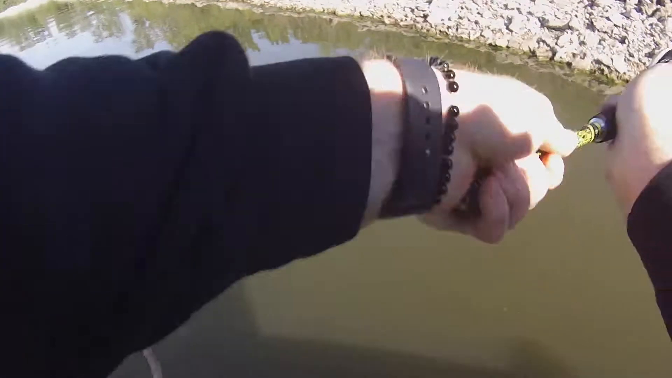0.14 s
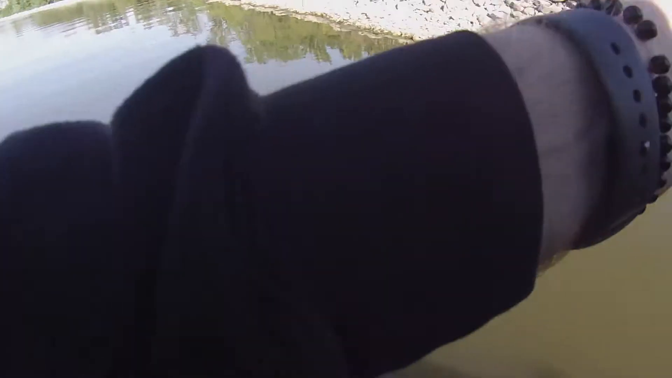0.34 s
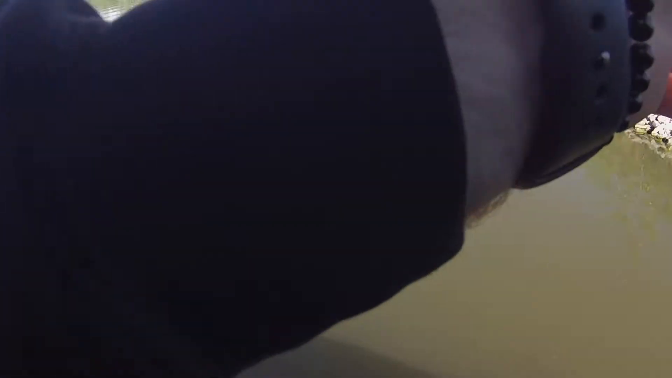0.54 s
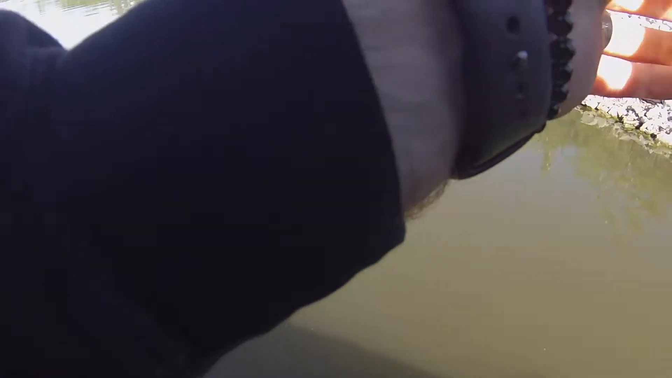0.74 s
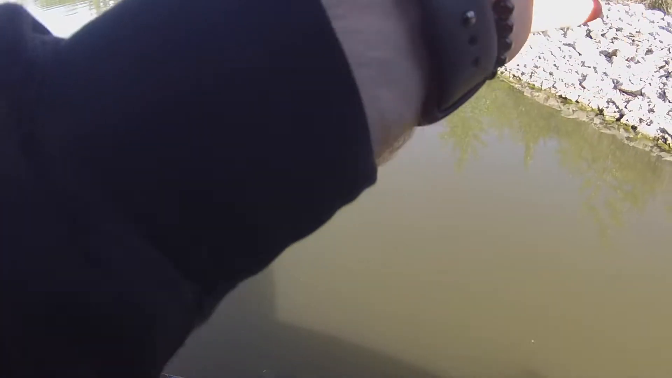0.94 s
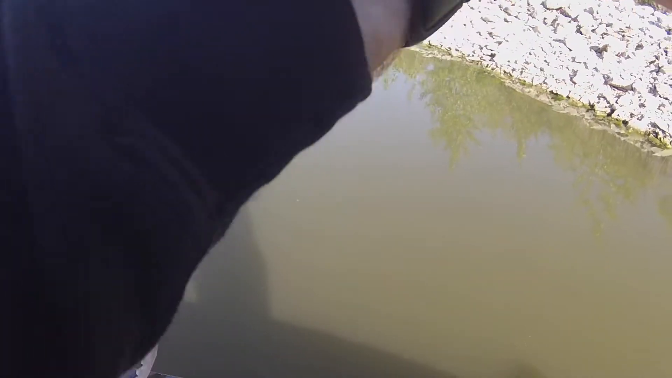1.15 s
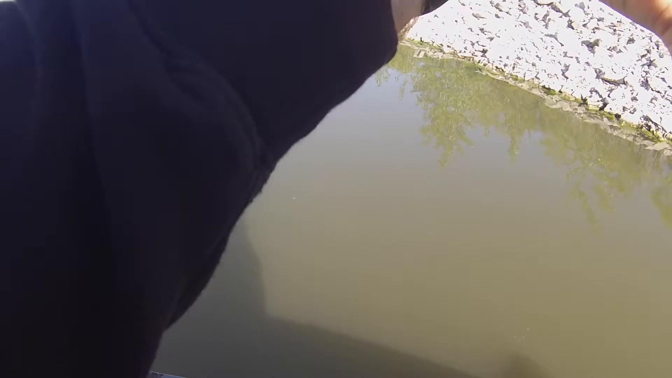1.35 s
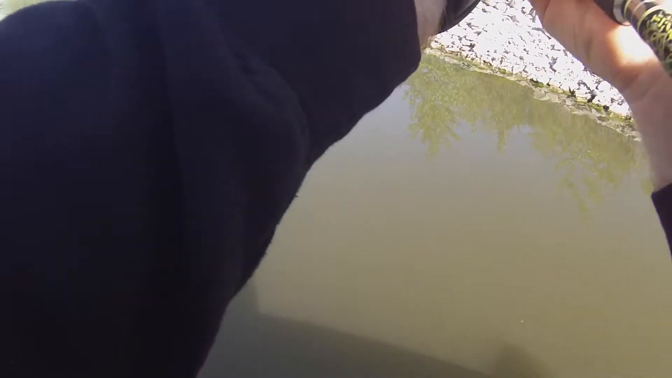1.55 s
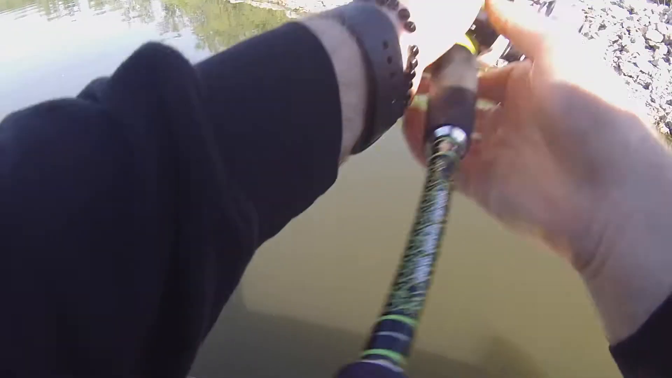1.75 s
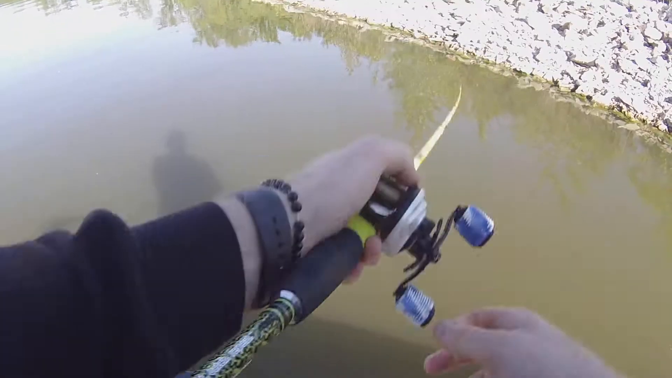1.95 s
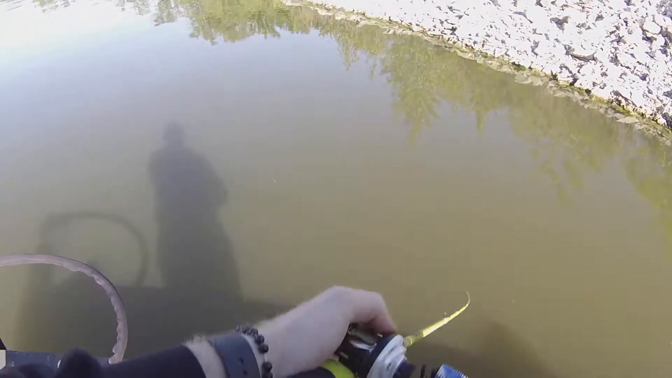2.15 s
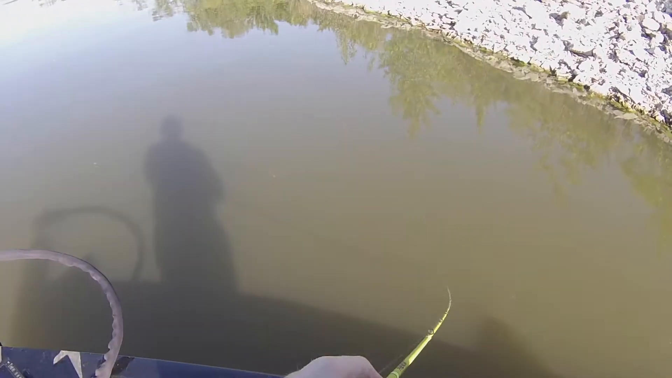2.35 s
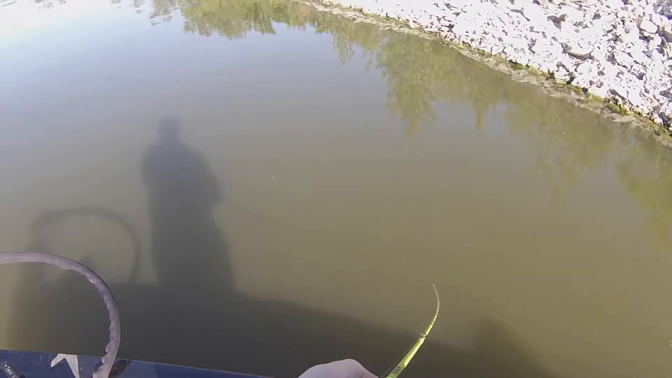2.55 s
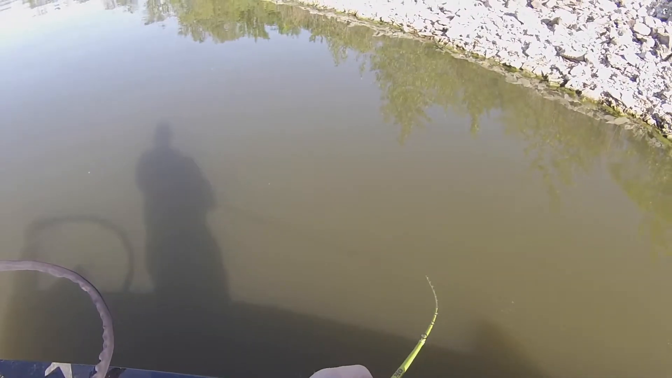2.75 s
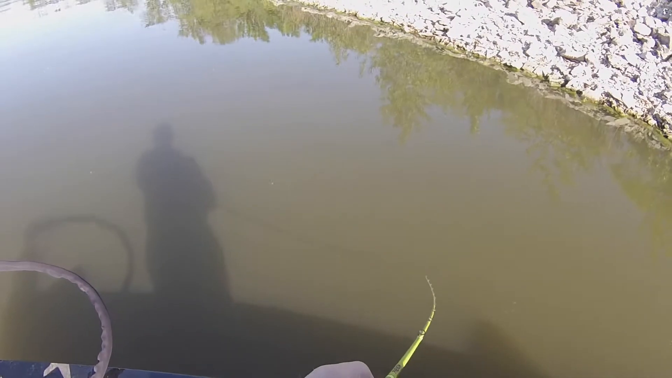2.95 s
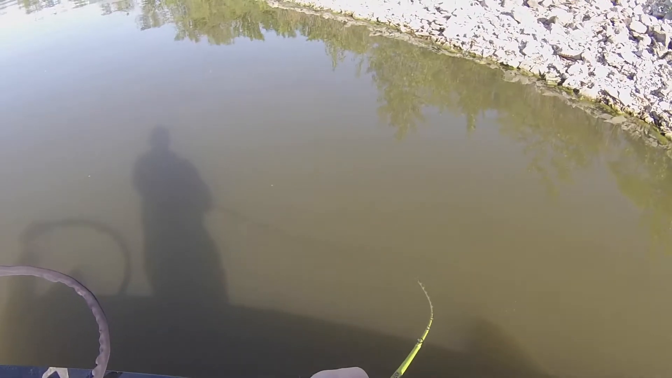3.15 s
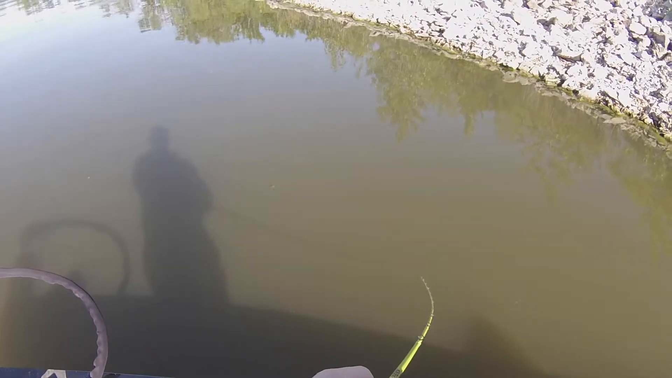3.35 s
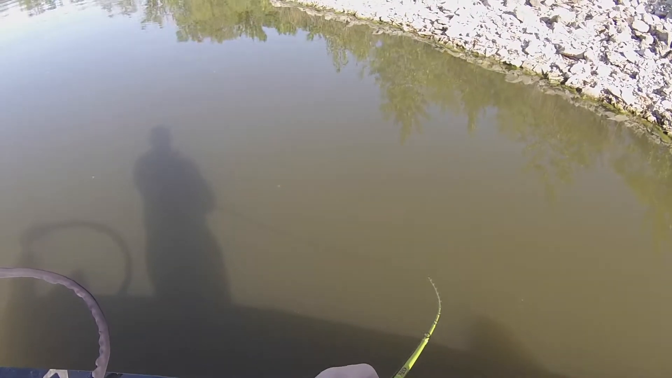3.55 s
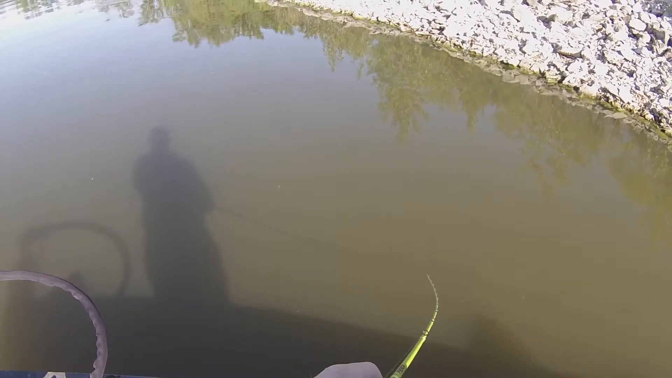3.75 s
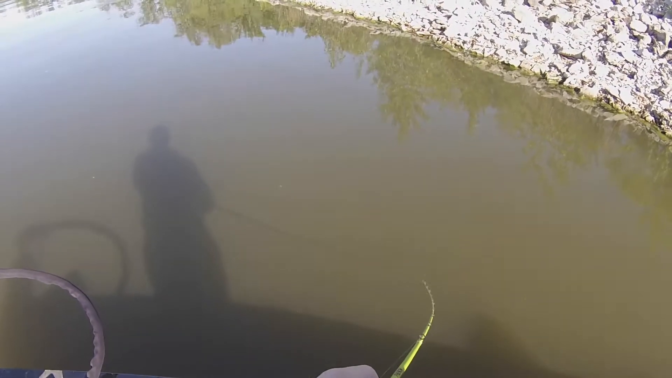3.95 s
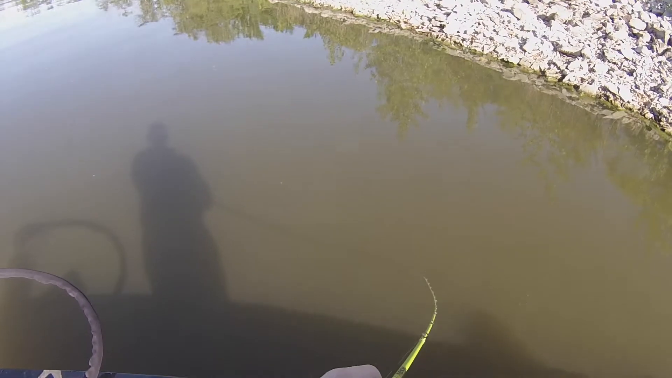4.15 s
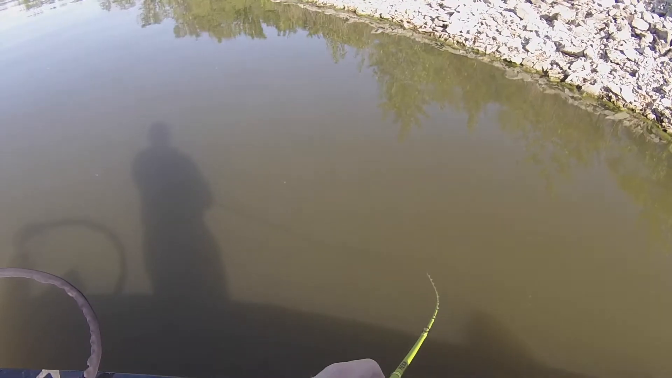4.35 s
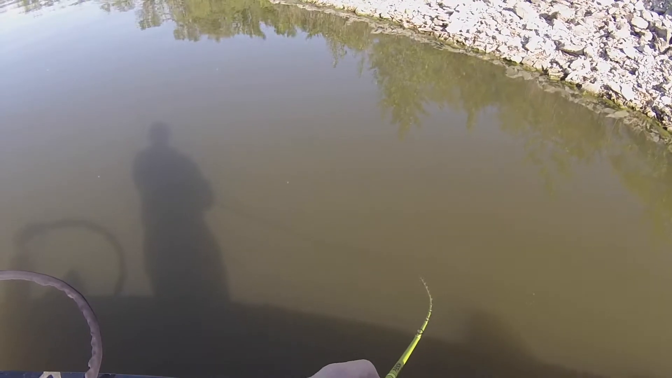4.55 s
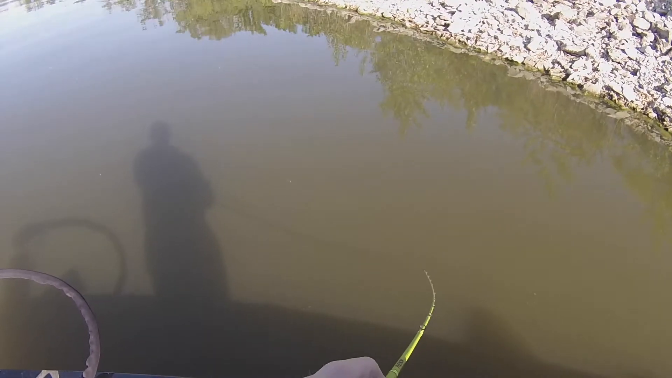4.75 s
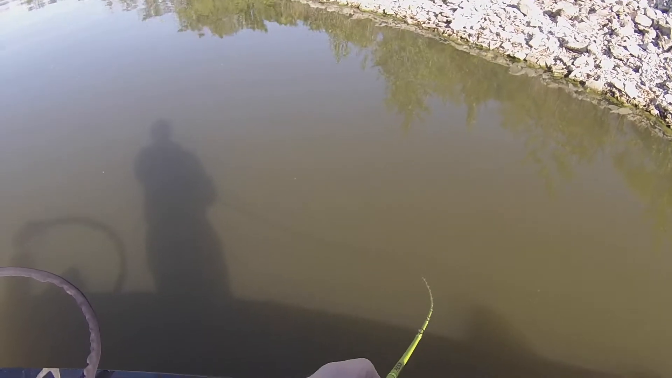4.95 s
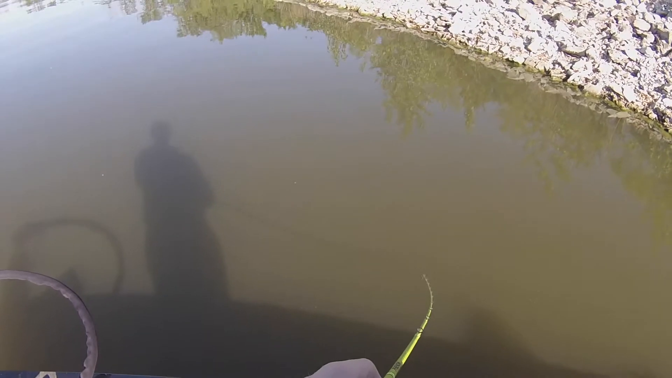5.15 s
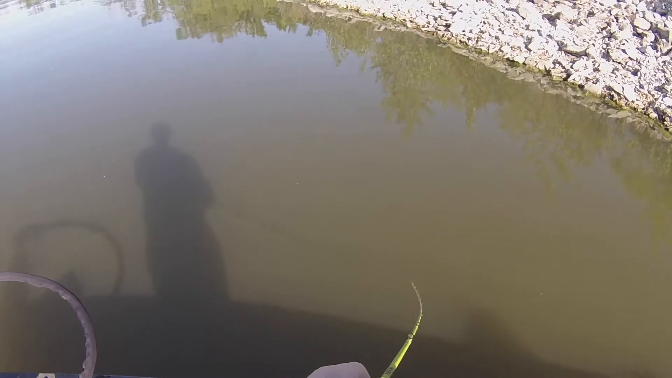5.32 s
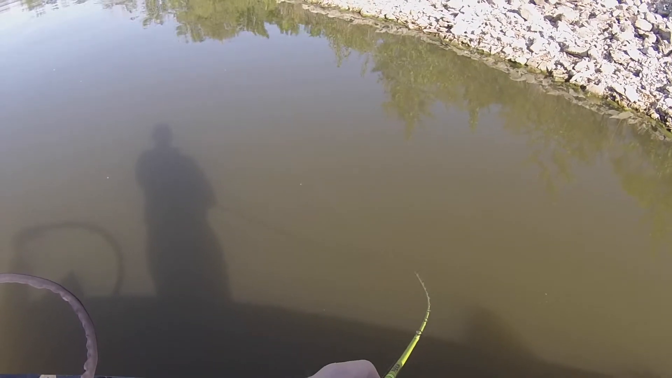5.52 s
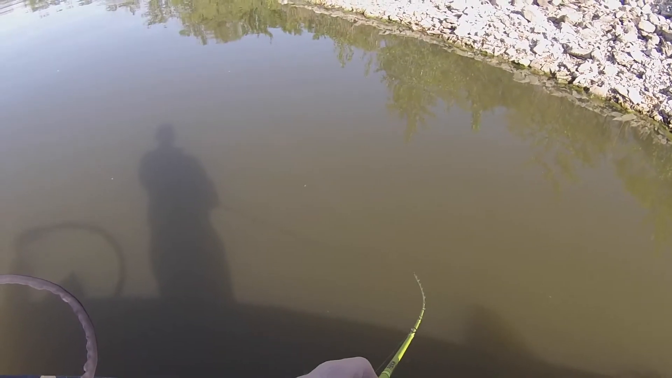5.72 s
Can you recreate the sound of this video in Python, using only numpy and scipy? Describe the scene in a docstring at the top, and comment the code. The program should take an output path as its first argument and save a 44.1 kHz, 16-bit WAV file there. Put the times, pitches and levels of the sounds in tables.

```python
"""A quiet lake shore, the microphone at the chest of an angler casting with a baitcasting reel.
The rod swishes as it sheds eddies, line hisses through the guides, and rough spots on the spool
whir down as it slows. A turn of the handle snaps the clutch shut and sets the frame ringing.
Then wet line is wound in with faint ticks, while water birds and a songbird call far off."""
import sys
import numpy as np
from scipy import signal
from scipy.fft import rfft, irfft
from scipy.io import wavfile
from scipy.ndimage import uniform_filter1d

SR = 44100
rng = np.random.default_rng(int(sys.argv[2]) if len(sys.argv) > 2 else 0)


def master(y):
    """Save y as 16-bit WAV."""
    cut = np.clip(np.atleast_2d(y).T, -1, 1)
    pcm = np.round(cut * 32767)  # scale
    wavfile.write(sys.argv[1], SR, pcm.astype(np.int16))


N = 259308
T = np.arange(N) / SR


def from_db(db):
    """Gain of a level in dB."""
    return 10 ** (np.asarray(db) / 20)


def rms_one(x):
    """Scale to rms 1."""
    return x / np.sqrt(np.mean(x ** 2) + 1e-20)


def envelope(start, attack, hold, release):
    """Straight rise from 0 to 1, hold, straight fall."""
    return np.interp(T, start + np.cumsum([0, attack, hold, release]), [0, 1, 1, 0])


def swell(s, length):
    """A rounded rise and fall centred on s."""
    return np.cos(np.pi * np.clip((T - s) / length, -.5, .5))


def swells(rows):
    """Gain of a set of swells, each (centre t/s, length/s, level/dB)."""
    return sum(from_db(db) * swell(s, length) for s, length, db in rows)


def saturate(x, power):
    """Grows as a power of x below 1 and levels off at 1 above."""
    return x ** power / np.sqrt(1 + x ** (2 * power))


def drift(rate):
    """Random wander of spread 1, with `rate` new values a second."""
    knots = rng.standard_normal(N // 8)
    return np.interp(T * rate, np.arange(len(knots)), knots) / np.sqrt(2 / 3)


def colour(x, spectrum):
    """Minimum-phase filter shaped by (f/Hz, level/dB) points; keeps the power of white noise."""
    size = 8192
    hz, db = np.transpose(spectrum)
    log_hz = np.log(np.maximum(np.fft.rfftfreq(size, 1 / SR), 1))
    gain = rms_one(from_db(np.interp(log_hz, np.log(hz), db)))
    cepstrum = irfft(np.log(gain))
    cepstrum[1:size // 2] *= 2
    cepstrum[size // 2 + 1:] = 0
    return signal.fftconvolve(x, irfft(np.exp(rfft(cepstrum))))[:N]


def noise(spectrum):
    """Coloured noise, rms 1."""
    return rms_one(colour(rng.standard_normal(N), spectrum))


def noise_band(hz, width):
    """A band of noise whose centre may glide; rms 1."""
    lowpass = signal.butter(2, width / 2, fs=SR, output="sos")
    slow = signal.sosfilt(lowpass, rng.standard_normal((2, N)))
    phase = 2 * np.pi * np.cumsum(hz + np.zeros(N)) / SR
    return rms_one(slow[0] * np.cos(phase) + slow[1] * np.sin(phase))


def burst(s, t60):
    """Noise that starts at s and dies away."""
    out, start, size = np.zeros(N), int(s * SR), SR // 8
    out[start:start + size] = rng.standard_normal(size) * np.exp(-np.log(1000) * T[:size] / t60)
    return out


def patter(clicks, t60):
    """Each click becomes a dying burst of noise."""
    decay = np.exp(-np.log(1000) / (t60 * SR))
    return signal.lfilter([1], [1, -decay], clicks + 1e-18) * rng.standard_normal(N)


def resonate(x, hz, width):
    """A resonance with gain 1 at its peak."""
    r, w = np.exp(-np.pi * width / SR), 2 * np.pi * hz / SR
    return signal.lfilter(np.array([1, 0, -1]) * (1 - r * r) / 2, [1, -2 * r * np.cos(w), r * r], x)


def ring(clicks, hz, t60):
    """A unit click sets a sine of height 1 ringing."""
    r, w = from_db(-60 / (t60 * SR)), 2 * np.pi * hz / SR
    return signal.lfilter([0, np.sin(w)], [1, -2 * r * np.cos(w), r * r], clicks + 1e-18)


def strike(clicks, modes):
    """Clicks set every mode of a body ringing."""
    return sum((-1) ** k * from_db(db) * ring(clicks, hz, t60) for k, (hz, db, t60) in enumerate(modes))


def soften(x, hz):
    """A soft contact gives less treble."""
    r = np.exp(-2 * np.pi * hz / SR)
    return signal.lfilter([(1 - r) ** 2], [1, -2 * r, r * r], x + 1e-18)


def touches(rows):
    """The push and the short rough scuff of each contact."""
    pushes = sum(from_db(db) * soften(signal.unit_impulse(N, int(s * SR)), hz) for s, db, _, hz in rows)
    scuffs = sum(from_db(db) * soften(burst(s, t60), hz) for s, db, t60, hz in rows)
    return pushes, scuffs


# air over the lake: f/Hz, relative level/dB
AIR_COLOUR = [(12, -27), (20, -6), (70, 1), (190, 0.5), (255, 0), (328, -5), (678, -9), (900, -14),
              (1150, -12), (1310, -8), (1550, -15), (2910, -17.5), (3740, -21.5), (9400, -26.5),
              (15500, -29)]
def open_air(level_db=-49):
    """The steady low hush all round the shore."""
    return from_db(level_db) * noise(AIR_COLOUR)


# honks from far across the water: centre t/s, length/s, strongest partial f/Hz, level/dB
HONKS = [(0.125, 0.043, 1210, -48), (1.106, 0.06, 1400, -50.5), (3.134, 0.054, 1062, -51),
         (3.248, 0.15, 1353, -46), (3.42, 0.13, 1365, -52.5), (5.158, 0.03, 1370, -49.5),
         (5.294, 0.13, 1343, -47), (5.46, 0.059, 1370, -49), (5.691, 0.062, 1583, -49.5)]
# their partials: multiple of the fundamental, relative level/dB
HONK_PARTIALS = [(2, -1), (3, -21), (5, -29), (6, -19)]
def water_birds(waver, arch=0.043):
    """Far honks with a slightly arched pitch; the long path over the water makes them flicker."""
    out = np.zeros(N)
    flicker = from_db(2.6 * drift(50))
    for s, length, hz, db in HONKS:
        span = np.abs(T - s) < length / 2
        shape = swell(s, length)[span]
        fundamental_hz = hz / 2 * waver[span] * (1 + arch * (shape - .8))
        phase = 2 * np.pi * np.cumsum(fundamental_hz) / SR
        voice = sum(from_db(level) * np.sin(round(k) * phase) for k, level in HONK_PARTIALS)
        out[span] += from_db(db) * flicker[span] * shape * voice
    return out


# distant song: centre t/s, f/Hz, slur/(Hz per s)
SONG_NOTES = [(4.181, 3600, -3000), (4.555, 3400, -5000), (4.674, 2910, 5500), (4.8, 3520, -6500),
              (4.84, 3540, 8000.5), (5.05, 3190, -1400), (5.26, 3180, -4000), (5.516, 3460, 902),
              (5.795, 3110, -4600)]
def songbird(waver, note_s=0.089, level_db=-58.5, warble_hz=70, warbles_per_s=45):
    """Thin whistled notes, each slurred up or down with a fast warble."""
    out = np.zeros(N)
    warble = warble_hz * np.sin(2 * np.pi * warbles_per_s * T)
    for s, hz, slur in SONG_NOTES:
        pitch = (hz + slur * (T - s) + warble) * waver
        out += from_db(level_db) * swell(s, note_s) * np.sin(2 * np.pi * np.cumsum(pitch) / SR)
    return out


# sleeve close to the microphone: t/s, level/dB
RUSTLE_LEVEL = [(0.0, -53.5), (0.08, -49.5), (0.15, -45.5), (0.2, -38.5), (0.26, -59)]
# its cloth: f/Hz, relative level/dB
CLOTH_COLOUR = [(100, 0), (400, 4.5), (900, 2.5), (1800, 2), (3000, -1), (7000, -9), (9000, -8.5),
                (15000, -22)]
def sleeve(fade_s=0.053):
    """Cloth rubs unevenly as the arm swings."""
    times, db = np.transpose(RUSTLE_LEVEL)
    gate = np.clip(np.minimum(T - times[0], times[-1] - T) / fade_s + 1, 0, 1)
    rubbing = from_db(np.interp(T, times, db) + 2.7 * drift(81.7))
    return rubbing * gate * noise(CLOTH_COLOUR)


# knocks on rod and grip: t/s, relative level/dB, scuff t60/s, treble corner f/Hz
TAPS = [(0.158, -51, 0.011, 2500), (0.1703, -23, 0.03, 2240), (0.199, -28, 0.02, 4000),
        (1.598, -50, 0.05, 12000), (1.7535, -29, 0.014, 12000), (2.0214, -35, 0.034, 14000),
        (2.035, -37, 0.024, 6000)]
# modes of rod and grip: f/Hz, relative level/dB, t60/s
GRIP_MODES = [(487, -7, 0.026), (857, -7.5, 0.052), (1430, -3.5, 0.018), (1670, -13.5, 0.059),
              (2310, -1, 0.016), (2740, -9.5, 0.046), (3000, -3.5, 0.019), (3600, -11.5, 0.041),
              (4540, -16, 0.035), (6060, 0, 0.01), (7800, -6, 0.012), (9700, -7.5, 0.013)]
def handling(scuff_db=-9, plate_db=-3):
    """Light knocks scuff the rod and grip and set them ringing."""
    pushes, scuffs = touches(TAPS)
    scuffs = colour(scuffs, [(200, -29), (1400, -13), (3500, 8), (9500, 4), (13000, -12)])
    return from_db(plate_db) * strike(pushes, GRIP_MODES) + from_db(scuff_db) * scuffs


# thumb on the spool rim: f/Hz, width/Hz, level/dB
SQUEAK_BANDS = [(1540, 130, -50.5), (1820, 91, -50), (4620, 380, -49.5)]
# handle while winding: centre t/s, length/s, level/dB
CREAKS = [(2.423, 0.1, -61), (2.987, 0.098, -57.5), (4.253, 0.044, -50), (4.4, 0.071, -56),
          (4.527, 0.059, -56)]
def friction():
    """Brief stick and slip: the thumb squeaks as it stops the spool, and later the handle creaks."""
    squeak = sum(from_db(db) * noise_band(hz, width) for hz, width, db in SQUEAK_BANDS)
    creak = noise_band(hz=2330, width=380)
    return swell(1.615, 0.021) * squeak + swells(CREAKS) * creak


# gears just in front of the microphone: f/Hz, relative level/dB
GEAR_COLOUR = [(500, 3), (1150, 8.5), (1340, 5.5), (1520, 2), (2100, 5.5), (2330, 5), (2600, 2),
               (2950, -0.5), (3700, -18), (8000, -19.5)]
def gears(level_db=-58, wander_db=1.74):
    """The turning gears whisper, their level wandering a little."""
    return from_db(level_db + wander_db * drift(3.97)) * noise(GEAR_COLOUR)


# clearest ticks of reel and line: t/s, relative level/dB
TICKS = [(2.7766, -32.5), (3.3304, -30), (3.4182, -35), (3.5475, -32.5), (3.6483, -27.5), (4.1936, -30),
         (4.3282, -28), (4.5046, -25), (4.682, -34), (5.1766, -27.5), (5.2137, -31), (5.305, -30),
         (5.5023, -30), (5.668, -22.5)]
# wetter stretches of line: centre t/s, length/s, level/dB
WET_STRETCHES = [(3.67, 0.16, -60), (4.14, 0.17, -59.5), (4.55, 0.14, -60), (5.23, 0.12, -60),
                 (5.535, 0.089, -52.5)]
# ticks and crackle alike: f/Hz, relative level/dB
TICK_COLOUR = [(1500, -3), (3500, -3), (7500, 1), (10000, 1.5), (14000, 1.5), (16000, -2.5)]
def wet_line(tick_gain_db=-9, tick_t60=0.0092, faint_per_s=6, grains_per_s=130, crackle_db=-70):
    """Damp line ticks and crackles onto the spool; wetter stretches crackle more."""
    clear = sum(from_db(db) * burst(s, tick_t60) for s, db in TICKS)
    faint = from_db(-36) * patter(rng.random(N) < faint_per_s / SR, tick_t60)
    ticks = from_db(tick_gain_db) * (clear + faint)
    landings = (rng.random(N) < grains_per_s / SR) * rng.standard_normal(N)
    crackle = (from_db(crackle_db) + swells(WET_STRETCHES)) * rms_one(patter(landings, t60=0.0018))
    return colour(ticks + crackle, TICK_COLOUR)


# clutch contacts, close up: t/s, relative level/dB, crack t60/s, treble corner f/Hz
CLUTCH_CONTACTS = [(2.0922, -23, 0.02, 4000), (2.099, -14, 0.027, 4200), (2.114, -20, 0.019, 12000),
                   (2.118, -1.5, 0.0094, 14000), (2.1222, 0.5, 0.0093, 15000), (2.1236, 4, 0.0056, 11000),
                   (2.127, -4, 0.0063, 10000), (2.1316, -14.5, 0.017, 6000), (2.138, -14.5, 0.005, 13000)]
# crack of a contact: f/Hz, relative level/dB
CRACK_COLOUR = [(200, -46), (450, -6), (900, -16), (1350, -2.5), (1800, -2), (2700, -4), (3500, 0.5),
                (4500, 2.5), (5700, -2), (7400, -1), (8900, 4), (11000, -5), (15500, -12)]
# modes of reel frame and rod: f/Hz, relative level/dB, t60/s
FRAME_MODES = [(344, -31.5, 0.028), (438, -30, 0.062), (488, -31, 0.047), (660, -26, 0.061),
               (806, -27.5, 0.047), (990, -25.5, 0.054), (1150, -19, 0.036), (1303, -18, 0.03),
               (1520, -26.5, 0.05), (2180, -31, 0.057), (3730, -43, 0.023), (4590, -22, 0.0094),
               (9200, -24, 0.015)]
def clutch(crack_db=-7, scatter_db=-43, scatter_t60=0.19):
    """Each contact is a short crack that sets the frame ringing; the stony bank scatters a little back."""
    pushes, cracks = touches(CLUTCH_CONTACTS)
    tail = sum(from_db(db + scatter_db) * burst(s, scatter_t60) for s, db, _, _ in CLUTCH_CONTACTS)
    scatter = colour(tail, [(200, -4), (600, 0), (1500, -3), (4000, -13), (15000, -35)])
    return from_db(crack_db) * colour(cracks, CRACK_COLOUR) + strike(pushes, FRAME_MODES) + scatter


# air moving at the microphone: centre t/s, length/s, f/Hz, level/dB
PUFFS = [(0.14, 0.091, 27, -35.5), (1.32, 0.15, 52, -42), (1.577, 0.13, 45, -42.5)]
def arm_puffs():
    """The arm pushes low puffs of air against the microphone."""
    return sum(from_db(db) * swell(s, length) * np.tanh(noise_band(hz, 44)) * np.sqrt(2)
               for s, length, hz, db in PUFFS)


def rod(top_hz=1138, top_db=-26.5, spread=.28, buzz_db=-51):
    """Eddies shed along the rod sing higher as it speeds up; later the slowing spool sets it buzzing."""
    tip_speed = envelope(start=0.09, attack=0.147, hold=0, release=0.05)
    eddies = sum(np.exp(-place ** 2 / 4) * noise_band(top_hz * tip_speed * np.exp(spread * place), 260)
                 for place in np.linspace(-2, 2, num=9))
    swish = from_db(top_db) * tip_speed ** 3.8 * rms_one(eddies)
    buzz = from_db(buzz_db) * swell(1.21, 0.54) * noise_band(hz=181, width=11)
    return swish + buzz


# flurries at the first guide: centre t/s, length/s, level/dB
FLURRIES = [(0.285, 0.12, -30.5), (0.39, 0.29, -43.5), (0.58, 0.087, -41.5), (0.79, 0.18, -56)]
# their slapping: f/Hz, relative level/dB
SLAP_COLOUR = [(150, -27), (300, 1.5), (600, 6.5), (950, -8.5), (1270, 6.5), (1500, -4), (1740, 8),
               (2000, -11), (2880, 3), (3800, -7), (9000, 2), (12000, -3), (14500, -6), (15600, -10)]
def coils(spit_db=-35.5):
    """Loose coils fly off the spool and slap the first guide; the hardest slaps spit brightly."""
    slap = swells(FLURRIES)
    spit = from_db(spit_db) * (slap / slap.max()) ** 2 * noise_band(hz=13400, width=1700)
    return slap * noise(SLAP_COLOUR) + spit


# line in the guides, out along the rod: f/Hz, relative level/dB
LINE_COLOUR = [(3500, 1), (5600, -0.5), (6600, 4.5), (7600, 6.5), (9000, 6.5), (10800, 1.5), (12300, 1),
               (13500, -9), (15500, -39)]
# line pressing harder on the rings: centre t/s, length/s, high band level/dB, low band level/dB
SINGS = [(0.488, 0.23, -41, -51), (1.065, 0.27, -56.5, -52.5)]
def guides(speed, shake, low_hz=4877, high_hz=9370, hiss_knee=136, slide_knee=97):
    """Line hisses and sings in the rings, sinking as it slows and fading below the knees (turns/s)."""
    sag = (speed / speed.max()) ** 0.11
    spray = from_db(-48) * rms_one(colour(shake, LINE_COLOUR))
    high_band = from_db(-50) * noise_band(high_hz * sag, width=1500)
    hiss = saturate(speed / hiss_knee, 3) * (spray + high_band)
    sing_high = swells([(s, length, high) for s, length, high, _ in SINGS])
    sing_low = swells([(s, length, low) for s, length, _, low in SINGS])
    slide = from_db(-50.5) * saturate(speed / slide_knee, 3)
    low_band = np.hypot(slide, sing_low) * noise_band(low_hz * sag, width=900)
    return hiss + low_band + sing_high * noise_band(hz=9800, width=3100)


# light touches on a guide: centre t/s, length/s, level/dB
BRUSHES = [(1.344, 0.046, -52.5), (1.602, 0.027, -50.5), (2.392, 0.025, -48)]
def slack_line():
    """Slack wet line brushes a guide."""
    return swells(BRUSHES) * noise(LINE_COLOUR)


def rough_spots(turns, count=300):
    """Every rough spot on spool and brake gives a click once a turn; rms about 1 at speed."""
    clicks = np.zeros(N)
    for size, place in rng.standard_normal((count, 2)):
        clicks[np.searchsorted(turns, np.arange(1, turns[-1] - 1) + place % 1)] += size
    return clicks / np.sqrt(uniform_filter1d(clicks ** 2, size=4000) + 1e-9)


def unbalance(turns):
    """An unbalanced spool hums unsteadily on the first six multiples of its turn rate."""
    return sum(from_db(db) * (1 + 0.42 * drift(30.2)) * np.sin(2 * np.pi * order * turns)
               for order, db in enumerate([2, 0.5, -6.5, 1, 1, -3], 1))


# spool speed through the cast: t/s, rate/(turns per s)
SPOOL_SPEED = [(0.17, 60), (0.25, 309), (0.38, 285), (0.47, 224), (0.6, 169), (1.05, 102), (1.52, 53.6),
               (1.65, 16)]
# resonances of the running reel, close to the microphone: f/Hz, width/Hz, relative level/dB
REEL_RESONANCES = [(291, 330, -5.5), (600, 260, -17), (1316, 49, 2.5), (1740, 160, -2), (2104, 590, 2.5),
                   (2420, 630, 3), (2990, 540, -0.5), (3830, 670, -7), (5130, 580, -6)]
def spool(whir_db=-49, hum_db=-49, whine_db=-8, rub=1.5, wobble=.004, throb=0.37, top_order=133):
    """The free spool's rough spots shake the reel on every turn while line pays out through the guides."""
    speed = np.interp(T, *np.transpose(SPOOL_SPEED))
    pace = speed / speed.max()
    turns = np.cumsum(speed * (1 + wobble * drift(40))) / SR
    # each part of the reel also rubs on its own
    shakes = rough_spots(turns) + rub * rng.standard_normal((len(REEL_RESONANCES), N))
    body = np.zeros(N)
    for shake, (hz, width, db) in zip(shakes, REEL_RESONANCES):
        # the shaking reaches about top_order times the turn rate, so the whir dulls as it slows
        reach = saturate(top_order * speed / hz, 1.6)
        body += from_db(db) * reach * resonate(resonate(shake, hz, width), hz, width)
    bearing_whine = from_db(whine_db) * swell(1.2, .5) * noise_band(28 * speed, width=35)
    whir = from_db(whir_db) * pace ** 0.071 * (rms_one(body) + bearing_whine)
    hum = from_db(hum_db) * pace ** 3.8 * unbalance(turns)
    # the line leaves the spool in little jerks
    jerks = (1 + throb * np.sin(2 * np.pi * turns)) * from_db(1.1 * drift(45.35))
    line = jerks * (guides(speed, shakes[0]) + coils())
    running = envelope(start=0.15, attack=0.053, hold=1.29, release=0.13)   # until the thumb stops it
    return running * (whir + hum + line)


def scene(wind_start_s=2.165, wind_attack_s=0.11):
    """The lake far off; the cast, the clutch and the retrieve close to one microphone."""
    waver = 1 + 0.0092 * drift(150)   # the birds' unsteady pitch
    lake = open_air() + water_birds(waver) + songbird(waver)
    cast = sleeve() + handling() + arm_puffs() + rod() + slack_line() + spool()
    winding = np.clip((T - wind_start_s) / wind_attack_s, 0, 1)
    retrieve = winding * (gears() + wet_line())
    return (lake + cast + friction() + clutch() + retrieve)[None]


def record(dry, ceiling=.85, cutoff_hz=15450):
    """The recorder rounds the highest peaks and cuts the top treble."""
    limited = dry / (1 + (dry / ceiling) ** 6) ** (1 / 6)
    return signal.sosfilt(signal.ellip(10, .1, 80, cutoff_hz, fs=SR, output="sos"), limited)


dry = scene()
out = record(dry)
master(out)
```